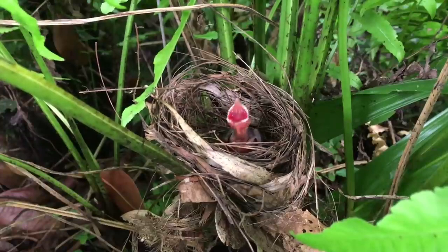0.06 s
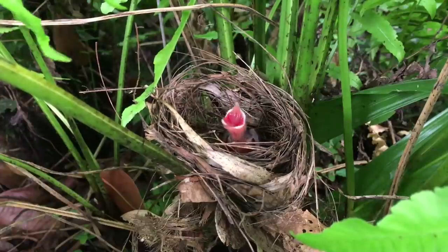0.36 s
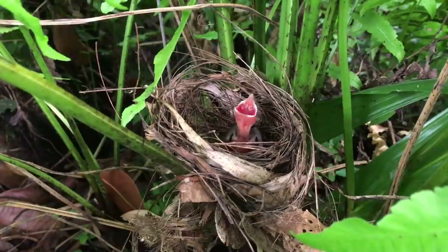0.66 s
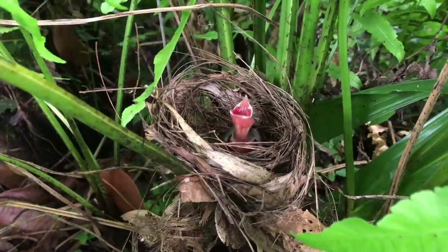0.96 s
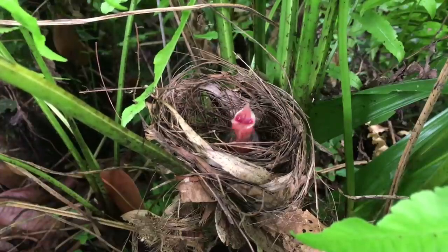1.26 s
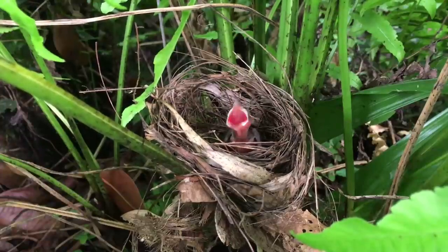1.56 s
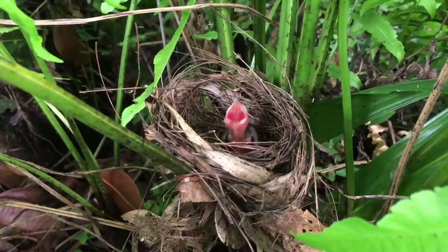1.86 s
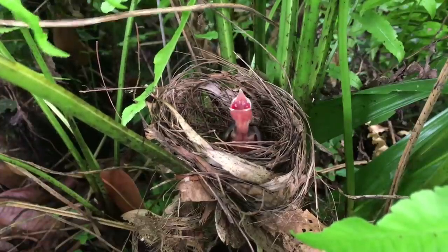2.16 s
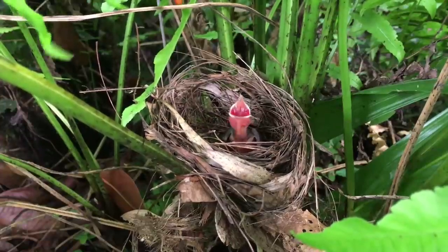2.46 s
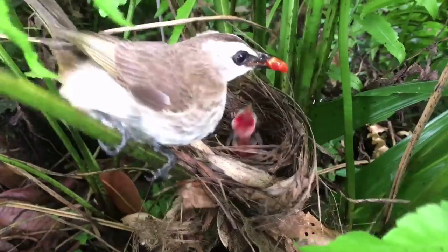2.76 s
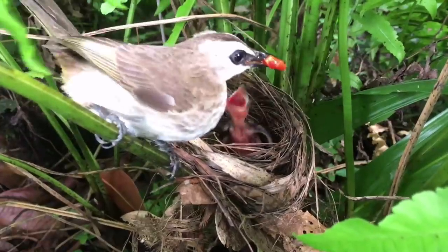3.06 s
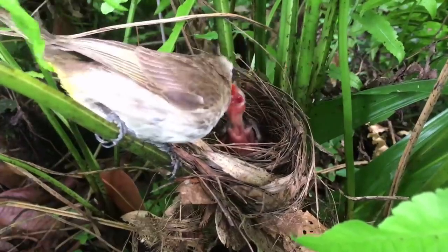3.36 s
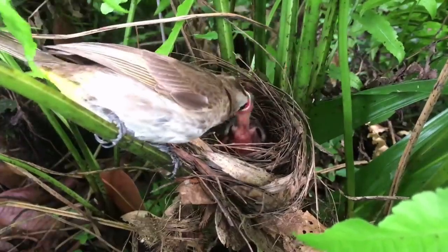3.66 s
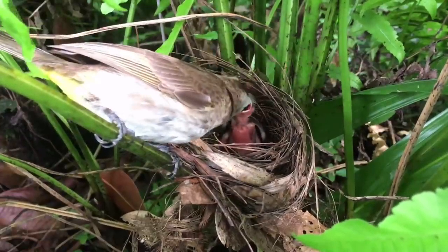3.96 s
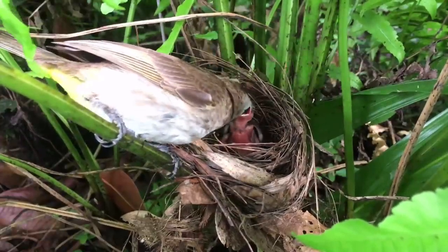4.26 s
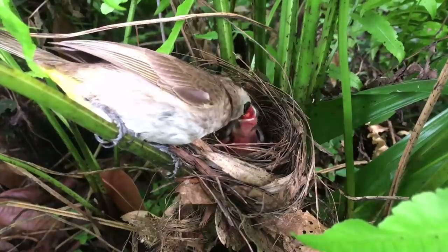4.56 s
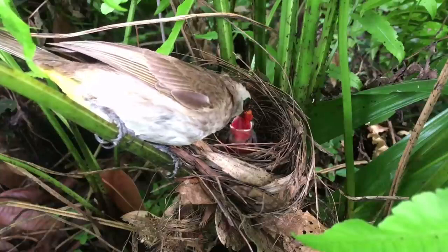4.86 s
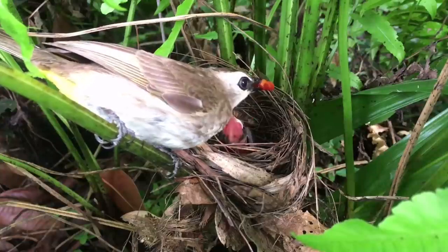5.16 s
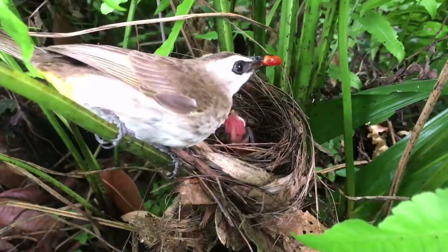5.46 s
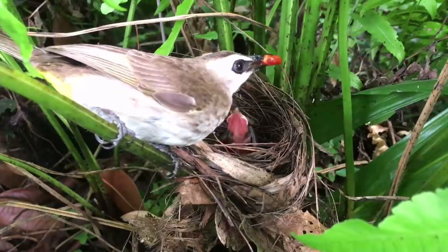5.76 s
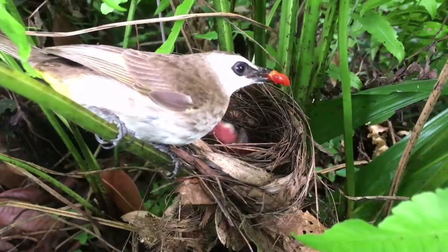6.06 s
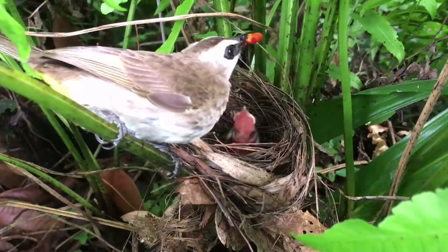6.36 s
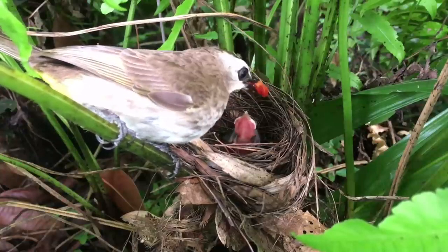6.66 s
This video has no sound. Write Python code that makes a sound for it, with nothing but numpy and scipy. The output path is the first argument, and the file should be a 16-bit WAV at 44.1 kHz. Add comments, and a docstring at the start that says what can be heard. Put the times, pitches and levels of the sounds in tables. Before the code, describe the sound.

Thin rising chirps from a baby bird, with small clicks and a brief rustle of wings, over distant traffic and faint far birds.

```python
"""In low greenery, a nestling begs with thin rising chirps and clicks of its bill. Each chirp is two
tones at once, one from each side of its voice organ, the syrinx. The parent flutters in through the
leaves and lands on a stem, with ticks of twigs and claws. Some way off, a motorbike opens its throttle
three times. Insects rasp and tick steadily and distant birds call, over a low rumble of traffic."""
import sys
import numpy as np
from scipy import signal
from scipy.fft import rfft, irfft, next_fast_len
from scipy.io import wavfile
from scipy.ndimage import uniform_filter1d

SR = 44100
rng = np.random.default_rng(int(sys.argv[2]) if len(sys.argv) > 2 else 0)


def wav_out(sig):
    """Save sig, one row per channel (or a flat mono array), as 16-bit PCM at SR to the path in sys.argv[1]."""
    wavfile.write(sys.argv[1], SR, np.round(np.clip(np.atleast_2d(sig).T, -1, 1) * 32767).astype(np.int16))


N = 299880

# A chirp climbs hoarsely to a shelf, leaps to a crest, catches briefly, reaches a top and trails off.
# Each row: start, leap and end in seconds; the low voice's start, shelf, crest, top and end pitch in Hz;
# its drop at the catch in Hz; the high voice's gap above it before and after the leap in Hz;
# shelf, crest and top level in dB; the high voice's level against the low and its change on the crest
# in dB; overtone level in dB; extra roughness before the leap and at the catch, from 0 to 1;
# how long before the leap the rough patch comes, in seconds.
BEGGING_CHIRPS = [(0.4, 0.459, .559, 4450, 5070, 5710, 6750, 6100, 360, 511, 762, -47, -41.5, -43, 2.5, 1, -48, 0.73, 0.5, 0.021),
                  (1.169, 1.214, 1.305, 4372, 4780, 5620, 6130, 5630, -25, 680, 718, -46.5, -41.5, -43.5, -2.5, -4, -45, 0.32, 0.03, 0.016),
                  (1.864, 1.926, 2.018, 4460, 4980, 6070, 6370, 5970, 20, 319.5, 403, -49.5, -37, -43.5, -1, -35, -46, 0.83, 0, 0.011),
                  (2.580, 2.635, 2.730, 4300, 5080, 6140, 6560, 6340, 128, 375, 334, -47, -38.5, -45, 1, -31, -46.5, 1, 0.14, 0.0175),
                  (3.151, 3.216, 3.312, 4260, 4590, 5110, 5540, 5150, -130, 551, 835, -52, -44, -46.5, 5.5, 3, -49.5, 0.64, 0.55, 0.057),
                  (3.855, 3.909, 3.994, 4845, 5010, 6160, 6780, 6980, 435, 1100, 567, -45.5, -46.5, -40.5, 6.5, -15, -48, 0.9, 0.6, 0.017),
                  (6.411, 6.433, 6.508, 4190, 4400, 5770, 6230, 5460, -230, 643, 424, -55.5, -40, -44, -11, -20, -66, 1, 0.2, 0.013)]
# Clicks of the bill. Each row: start in seconds, level in dB.
BILL_SNAPS = [(1.161, -38), (1.885, -44), (3.139, -45.5), (3.8485, -37), (6.414, -53)]
# Ticks of twigs and claws. Each row: start in seconds, level in dB, seconds to fade by 60 dB.
TWIG_TAPS = [(.951, -50, 0.19), (2.41, -54, 0.061), (2.828, -48.5, 0.028), (2.892, -47, 0.033),
             (2.982, -48, 0.032), (3.584, -55, 0.017), (4.381, -54, 0.034), (4.737, -46, 0.056)]
# Feathers brushing leaves. Each row: start in seconds, end in seconds, level in dB.
LEAF_BRUSHES = [(2.241, 2.275, -54), (2.411, 2.45, -64), (2.63, 2.68, -58), (2.688, 2.96, -51),
                (3.07, 3.09, -55), (3.57, 3.62, -63.5)]
# Bursts of throttle. Each row: opening and closing time in seconds, engine firings a second at each
# of those times, exhaust note and rasp levels in dB as they would be at BIKE_HZ.
THROTTLE_BURSTS = [(0.054, 0.147, 117.6, 121, -33.5, -52), (0.611, 0.769, 103.9, 111.9, -34.5, -54),
                   (1.189, 1.877, 101.3, 135.8, -34, -54)]
BIKE_HZ = 122.5
# Far calls that hold a note, then arch. Each row: start, crest and end in seconds, held pitch and
# crest pitch in Hz, level at the crest in dB.
ARCHING_CALLS = [(0.201, 0.322, .45, 1056, 1203, -56), (2.581, 2.981, 3.14, 1056, 1221, -59.5),
                 (5.381, 5.789, 5.97, 991, 1190, -61)]
# A far songbird's notes. Each row: start and length in seconds, first and last pitch in Hz, level in dB.
SONG_NOTES = [(2.131, 0.039, 1860, 1780, -59.5), (2.289, 0.08, 1580, 1680, -61.5),
              (2.45, 0.044, 1720, 1850, -63), (2.571, 0.074, 1616, 1570, -63),
              (2.734, .062, 1293, 1475, -62), (3.029, .035, 1670, 1640, -63),
              (6.038, .035, 1390, 1430, -65), (6.195, 0.023, 1730, 1790, -64),
              (6.345, .07, 1624, 1685, -69), (6.567, 0.03, 1770, 1630, -64), (6.611, .035, 1440, 1490, -65),
              (6.742, 0.021, 1660, 1730, -65)]
# The rise and fall of the traffic. Each row: time in seconds, level in dB.
TRAFFIC_LEVELS = [(1.2, -43.5), (2.6, -45), (3.5, -47), (4.1, -44), (5.7, -47), (6.8, -46)]

# The tone colour of each sound, from bass to treble. Each row: frequency in Hz, relative level in dB.
BILL_SPECTRUM = [(800, -20), (1600, -3.5), (3000, -28), (6000, -28), (9700, 7.5), (12000, -15),
                 (16000, -37)]  # the bill snapping shut
TWIG_SPECTRUM = [(700, -32), (1800, 0.5), (3500, -1.5), (6000, 1.5), (8500, 2.5), (12000, 3), (16000, -5)]  # twigs and claws
LEAF_SPECTRUM = [(500, -5.5), (1500, -3.5), (3000, -4.5), (8000, -3), (13000, 4)]  # brushed leaves
EXHAUST_SPECTRUM = [(150, -57), (240, -21), (330, 0.5), (470, -11.5), (660, -1), (820, -2.5), (950, 5.5),
                    (1130, 3), (1350, -11.5), (1900, -11.5), (3000, -15.5), (5000, -29)]  # the motorbike's rasp
WING_SPECTRUM = [(3900, -66), (4300, -9.5), (4650, 3.5), (5100, -5.5), (5450, -18), (7000, -39)]  # the rasping insect's wing
TRILL_SPECTRUM = [(7500, -41), (9500, -9), (10200, -29), (10700, -13), (11050, -13), (11500, -0.5),
                  (12400, -8), (15000, -12.5)]  # the ticking insect
TRAFFIC_SPECTRUM = [(25, -38), (38, -15), (52, 1), (85, 1.5), (125, 2), (195, -2.5), (290, -19.5),
                    (480, -43)]  # low traffic rumble
AIR_SPECTRUM = [(250, 6.5), (420, 0), (650, 0), (930, 3.5), (1300, -3), (2000, -10.5), (3800, -19),
                (6000, -18), (8000, -41)]  # open air
HISS_SPECTRUM = [(8000, -53), (11000, -12.5), (13300, -14), (14300, -3.5), (16000, -9)]  # fine high hiss
SQUAWK_SPECTRUM = [(1500, -18), (2200, 2), (2650, -15), (3050, -10), (4000, -38)]  # a hoarse far note


def nestling():
    """The nestling's begging chirps, lightly scattered by the leaves."""
    out = np.zeros(N)
    for row in BEGGING_CHIRPS:
        add(out, *chirp(row))
    return echoes(out, t60=.12, wet_db=-27)


def chirp(row, flutter_hz=140, flutter_rate=1400, waver_hz=12, shimmer_db=3.0,
          sum_db=-3, high_octave_db=-4, third_db=-14, rasp_db=-10, tug_db=-16):
    """Two membranes sing side by side and beat together; pressed hard, they flutter wildly."""
    i, gate = span(row[0], row[2], fade_s=0.0058)
    t = TIME[i]
    low_hz, high_hz, low_db, high_db, overtone_db, rough = chirp_shape(t, row)
    # complex tones: multiplying two of them adds their pitches, and .imag gives the sound wave
    low, high = (np.exp(1j * turn(hz + flutter_hz * rough * walk(flutter_rate, t)
                                  + waver_hz * walk(236, t))) for hz in (low_hz, high_hz))
    voices = sum(undb(db + shimmer_db * rough * walk(flutter_rate, t)) * voice
                 for db, voice in ((low_db, low), (high_db, high)))
    # the shared airflow bends the wave, adding each voice's octave and a tone at their summed pitch
    high_share = 1 / (1 + undb(low_db - high_db))
    weights = [1 - high_share, high_share * undb(sum_db) / 2, high_share ** 2 * undb(high_octave_db)]
    overtone = weights[0] * low ** 2 + weights[1] * low * high + weights[2] * high ** 2
    overtone /= np.linalg.norm(weights, axis=0)
    # a third harmonic shows only while the pitch passes 5000 Hz
    third = undb(third_db) * np.exp(-((low_hz - 5000) / 350) ** 2)
    overtone *= undb(overtone_db) * (1 + third * low)
    # each membrane tugs the other at the beat rate, and swirling air frays the tone
    tug = undb(tug_db) * high_share * (high / low).real
    fray = undb(rasp_db) * rough * (walk(6000, t) + 1j * walk(6000, t))
    wave = voices * (1 + tug + fray / 2) + overtone * (1 + 2 * tug + fray)
    return t[0], np.sqrt(2) * gate * wave.imag


def chirp_shape(t, row, leap_s=.021, catch_s=.036, fall_s=.028, glide_s=.0051, shelf_rise_hz=109,
                join_s=.024, quit_s=.04, alone_db=-15, throat_hz=9800, hoarse_s=.017):
    """The pitch, level and roughness of the two voices through one chirp."""
    start, leap, end, start_hz, shelf_hz, crest_hz, top_hz, end_hz, drop_hz = row[:9]
    shelf_gap_hz, top_gap_hz, shelf_db, crest_db, top_db, high_db, hush_db, overtone_db = row[9:17]
    shelf_rough, catch_rough, lead_s = row[17:]
    shelf, crest, catch = start + .55 * (leap - start), leap + leap_s, leap + catch_s
    top, dip_hz = max(end - fall_s, catch), crest_hz - drop_hz
    hz, effort_db = curves([(start, start_hz, shelf_db - 6),
                            (shelf, shelf_hz - shelf_rise_hz / 2, shelf_db),
                            (leap, shelf_hz + shelf_rise_hz / 2, shelf_db),
                            (crest, crest_hz, crest_db),
                            (catch, dip_hz, crest_db),
                            ((catch + top) / 2, dip_hz + .61 * (top_hz - dip_hz), top_db),
                            (top, top_hz, top_db),
                            (end, end_hz, top_db - 10)], t)
    hz = uniform_filter1d(hz, int(glide_s * SR), mode="nearest")
    gap_hz = np.interp(t, [leap, crest], [shelf_gap_hz, top_gap_hz])
    # the voices share one airflow; the high one joins late and quits early
    absent_db = np.interp(t, [start, start + join_s, end - quit_s, end], [alone_db, 0, 0, alone_db])
    balance_db = high_db + absent_db + hush_db * bump(t, (crest + catch) / 2, catch_s / 2)
    low_db = effort_db - 10 * np.log10(1 + undb(balance_db) ** 2)
    # the overtone fades after the catch, and away from the pitch at which the throat resonates
    dull_db = -165 * np.maximum(t - catch, 0) - .0015 * abs(2 * hz - throat_hz)
    rough = .19 + shelf_rough * bump(t, leap - lead_s, hoarse_s)
    rough += catch_rough * bump(t, catch, hoarse_s / 2)
    return hz, hz + gap_hz, low_db, low_db + balance_db, overtone_db + dull_db, np.clip(rough, 0, 1)


def bill_and_twigs(bill_t60=0.015):
    """The bill clicks, and twigs and claws tick."""
    out = np.zeros(N)
    for start, db in BILL_SNAPS:
        add(out, start, tick(BILL_SPECTRUM, db, bill_t60))
    for start, db, t60 in TWIG_TAPS:
        add(out, start, tick(TWIG_SPECTRUM, db, t60))
    return out


def tick(spectrum, db, t60):
    """A small dry contact: a burst of noise that fades by 60 dB in t60 seconds."""
    t = TIME[:SR // 4]
    return colour(noise(len(t)), spectrum) * undb(db - 60 * t / t60)


def squeak(start=4.737, length_s=0.0146):
    """A tiny falling squeak while the parent offers a berry."""
    out = np.zeros(N)
    add(out, start, whistle(length_s, from_hz=3600, to_hz=2100, db=-56, waver=.036, waver_rate=1350))
    return out


def parent_wings(grain_db=3.0, wingbeat_hz=22, beat_db=2, patchy_db=2.0, attack_s=0.05, release_s=0.16):
    """The parent's wingbeats brush the leaves: dense tiny cracks that come in surges."""
    brushes = [undb(db) * held(start, end, attack_s, release_s) for start, end, db in LEAF_BRUSHES]
    crack_db = grain_db * np.minimum(rng.exponential(size=N), 7)
    cracks = colour(noise() * undb(crack_db), LEAF_SPECTRUM)
    wingbeats = np.sin(turn(wingbeat_hz + 2 * walk(4.4)))
    return cracks * np.max(brushes, axis=0) * undb(beat_db * wingbeats + patchy_db * np.tanh(walk(90)))


def motorbike(uneven_db=-23, octave_db=-21, gas_db=-4):
    """A far engine booms at its firing rate and rasps near 1000 Hz; alternate strokes differ a little."""
    hz, note_db, rasp_db = revs()
    phase = turn(hz * (1 + .004 * walk(30)))
    uneven = undb(uneven_db) * np.sin(3 / 2 * phase)
    note = np.sqrt(2) * (np.sin(phase) + uneven + undb(octave_db) * np.sin(2 * phase))
    # the overtones arrive by many paths, so each drifts in phase and level
    overtones = sum(np.sin(k * phase + 2 * walk(8)) * undb(3 * walk(20)) for k in range(2, 15))
    gas_puffs = noise() * (1 + np.cos(phase))
    rasp = unit(colour(overtones, EXHAUST_SPECTRUM) + undb(gas_db) * colour(gas_puffs, EXHAUST_SPECTRUM))
    return note * undb(note_db + walk(20) / 2) + echoes(rasp * undb(rasp_db), t60=.3, wet_db=-12)


def revs(attack_s=0.069, release_s=0.055, sag_hz_per_s=32, away_db_per_s=-31):
    """The engine speeds up while the throttle is open; after the last burst it slows and fades."""
    points, throttle = [], 0
    for opens, closes, from_hz, to_hz, *levels in THROTTLE_BURSTS:
        halfway_hz = from_hz + .62 * (to_hz - from_hz)
        points += [(opens, from_hz, *levels), ((opens + closes) / 2, halfway_hz, *levels),
                   (closes, to_hz, *levels)]
        throttle = np.maximum(throttle, held(opens, closes, attack_s, release_s))
    hz, note_db, rasp_db = curves(points, TIME)
    coasting_s = np.maximum(TIME - THROTTLE_BURSTS[-1][1], 0)
    hz = np.maximum(hz - sag_hz_per_s * coasting_s, BIKE_HZ / 2)
    # louder as the engine speeds up, quieter with the throttle shut
    note_db += .21 * (hz - BIKE_HZ) - 13.5 * (1 - throttle)
    rasp_db += .2653 * (hz - BIKE_HZ) - 4.5 * (1 - throttle)
    away_db = away_db_per_s * coasting_s
    return hz, note_db + away_db, rasp_db + away_db


def far_birds(waver=0.0223, arch_s=0.14, held_db=-6.5, flicker_db=3.5):
    """Long arching calls and short husky whistles, blurred by the trees."""
    out = np.zeros(N)
    for start, crest, end, held_hz, crest_hz, db in ARCHING_CALLS:
        i, gate = span(start, end, fade_s=.03)
        t = TIME[i]
        arch = bump(t, crest, arch_s)
        hz = (held_hz + (crest_hz - held_hz) * arch) * (1 + waver * walk(117.1, t))
        out[i] += gate * undb(db + held_db * (1 - arch) + flicker_db * walk(31.6, t)) * np.sin(turn(hz))
    for start, *note in SONG_NOTES:
        add(out, start, whistle(*note, waver, waver_rate=320))
    return echoes(out, t60=.3, wet_db=-6)


def whistle(length_s, from_hz, to_hz, db, waver, waver_rate):
    """One short sliding note, made husky by a quick wobble in its pitch."""
    t = TIME[:int(length_s * SR)]
    hz = np.linspace(from_hz, to_hz, len(t)) * (1 + waver * walk(waver_rate, t))
    return undb(db) * signal.windows.tukey(len(t)) * np.sin(turn(hz))


def far_squawk(peak_s=0.31, width_s=0.025, db=-60):
    """One short hoarse note from far off."""
    swell = np.exp(-((TIME - peak_s) / width_s) ** 2 / 2)
    return echoes(colour(noise(), SQUAWK_SPECTRUM) * undb(db) * swell, t60=.3, wet_db=-6)


def rasping_insect(rate_hz=8.05, tires_s=5.95, tired_hz=7, rasp_s=.115, rasp_db=-67, between_db=-74):
    """Soft, regular rasps ring through an insect's wing, slowing near the end."""
    strokes, centre_s = np.zeros(N), .03
    while centre_s < TIME[-1]:
        add(strokes, centre_s - rasp_s / 2, np.hanning(int(rasp_s * SR)) * undb(rng.standard_normal()))
        centre_s += 1 / (rate_hz if centre_s < tires_s else tired_hz)
    return colour(noise(), WING_SPECTRUM) * np.hypot(undb(rasp_db) * strokes, undb(between_db))


def ticking_insect(rate_hz=30, tick_s=0.0028, scatter_db=-1.5, ring=0.26, db=-67):
    """A second insect ticks very high and fast, each tick a short scrape."""
    cycles = turn(rate_hz + .15 * walk(1.0)) / (2 * np.pi)
    strokes = np.exp(-(cycles % 1) / rate_hz / tick_s) * undb(scatter_db * walk(rate_hz))
    return unit(colour(noise(), TRILL_SPECTRUM) * (strokes + ring)) * undb(db)


def traffic_and_air(air_db=-60.5, hiss_db=-66, swell_db=4):
    """Low traffic rumble, open air and a fine high hiss that slowly swells."""
    rumble_db, = curves(TRAFFIC_LEVELS, TIME)
    rumble = colour(noise(), TRAFFIC_SPECTRUM) * undb(rumble_db)
    air = colour(noise(), AIR_SPECTRUM) * undb(air_db + walk(1.7) / 2)
    hiss = colour(noise(), HISS_SPECTRUM) * undb(hiss_db + swell_db * TIME / TIME[-1] + 0.31 * walk(40))
    return rumble + air + hiss


def echoes(x, t60, wet_db):
    """Leaves and trunks scatter a sound into a soft tail that fades by 60 dB in t60 seconds."""
    t = TIME[:SR]
    tail = noise(SR) * undb(-60 * t / t60) * (1 - np.exp(-t / .008))
    return x + undb(wet_db) * signal.fftconvolve(x, tail / np.linalg.norm(tail))[:N]


def undb(db):
    """Turn decibels into a number to multiply by."""
    return 10 ** (np.asarray(db) / 20)


def unit(x):
    """Scale a sound to an average power of 1."""
    return x / np.sqrt(np.mean(x ** 2) + 1e-20)


def curves(table, t):
    """Join a table's values with straight lines; its first column is the time."""
    times, *columns = np.transpose(table)
    return [np.interp(t, times, column) for column in columns]


def colour(x, spectrum):
    """Give a sound a tone colour, at an average power of 1."""
    hz, db = np.transpose(spectrum)
    size = next_fast_len(len(x))
    bin_hz = np.maximum(np.fft.rfftfreq(size, 1 / SR), 1)
    gain = undb(np.interp(np.log(bin_hz), np.log(hz), db))
    return unit(irfft(rfft(x, size) * gain, size)[:len(x)])


def noise(size=N):
    """White noise, an even hiss."""
    return rng.standard_normal(size)


TIME = np.arange(N) / SR  # each sample's time in seconds


def walk(rate, t=TIME):
    """A random wobble of about size 1, with `rate` new values a second."""
    steps = (t - t[0]) * rate
    return np.sqrt(3 / 2) * np.interp(steps, np.arange(2 ** 12), noise(2 ** 12), period=2 ** 12)


def turn(hz):
    """The phase of a changing pitch: how far its wave has turned, in radians."""
    return 2 * np.pi * np.cumsum(hz) / SR


def span(start, end, fade_s):
    """The samples a sound covers, and a gate that fades it just outside its ends."""
    i = np.arange(max(int((start - fade_s) * SR), 0), min(int((end + fade_s) * SR), N))
    return i, np.clip(np.minimum(TIME[i] - start, end - TIME[i]) / fade_s + 1, 0, 1) ** 2


def bump(t, centre_s, width_s):
    """A smooth swell of height 1."""
    return np.exp(-((t - centre_s) / width_s) ** 2)


def held(start, end, attack_s, release_s):
    """A level that rises to 1 at the start, holds, and dies away after the end."""
    return np.exp(np.minimum(TIME - start, 0) / attack_s - np.maximum(TIME - end, 0) / release_s)


def add(out, start, x):
    """Mix a sound in, `start` seconds from the beginning."""
    i = max(int(start * SR), 0)
    out[i:i + len(x)] += x[:max(N - i, 0)]


def scene():
    """Everything is heard from one spot by the nest, the same in both channels."""
    mono = nestling() + bill_and_twigs() + squeak() + parent_wings()
    mono += motorbike() + far_birds() + far_squawk()
    mono += rasping_insect() + ticking_insect() + traffic_and_air()
    return np.array([mono, mono])


def record(dry, top_hz=15850):
    """A steep filter cuts away the highest treble."""
    return signal.sosfilt(signal.ellip(10, .2, 70, top_hz, fs=SR, output="sos"), dry)


dry = scene()
out = record(dry)
wav_out(out)
```